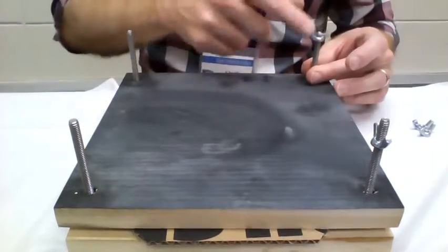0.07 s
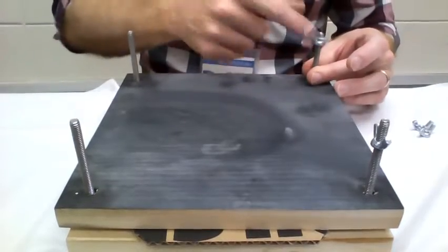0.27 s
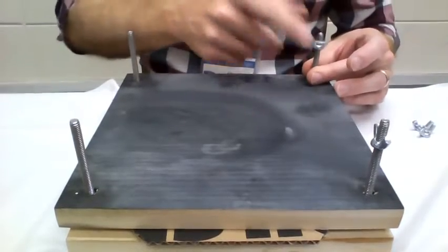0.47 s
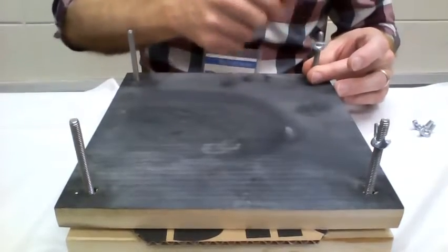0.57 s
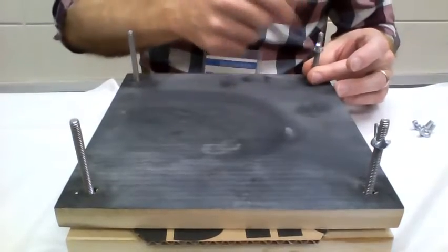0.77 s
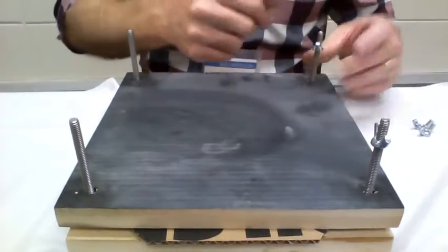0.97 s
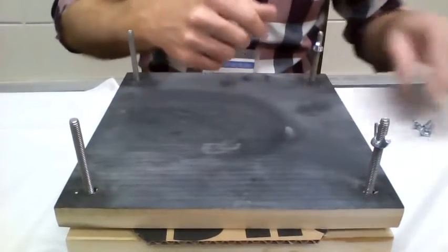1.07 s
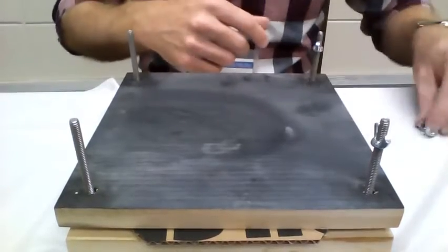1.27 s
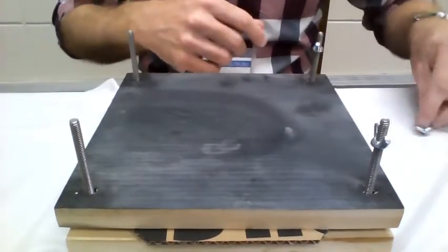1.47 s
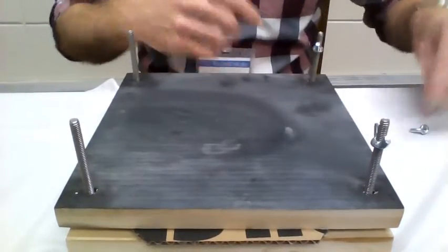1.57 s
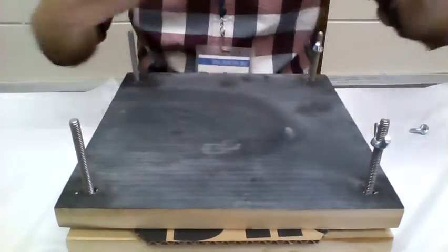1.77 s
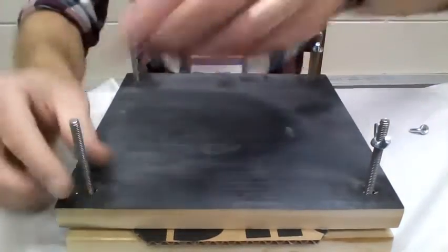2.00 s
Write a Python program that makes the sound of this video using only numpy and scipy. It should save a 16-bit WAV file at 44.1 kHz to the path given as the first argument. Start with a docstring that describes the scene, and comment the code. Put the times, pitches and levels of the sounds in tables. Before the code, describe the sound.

A metal wing nut spins down a threaded bolt with a chattering rattle, flicked at about 0.1 and 0.3 seconds and stopping near 0.55. Soft, low table bumps, pats and faint brushing follow until about 1.1 seconds. A spare nut clicks at 1.4. Near 1.95, a knocked bolt scrapes and briefly rings its heavy metal plate. Low ventilation rumbles throughout in a small, slightly reverberant room.

```python
"""Over a low ventilation rumble, a wing nut spins down a threaded bolt in a heavy metal plate, each
impact on the thread exciting brief modes. A finger flicks it on, and it chatters to a stop after half
a second. A hand bumps the table into low, damped vibration, with pats, brushing and tiny ticks.
A spare nut clicks as it is picked up; last, a hand knocks a front bolt, which scrapes and rings the
plate. A small hard-walled room reverberates after each sound."""
import sys
import numpy as np
from scipy import signal
from scipy.fft import rfft, irfft
from scipy.io import wavfile

SR = 44100
rng = np.random.default_rng(int(sys.argv[2]) if len(sys.argv) > 2 else 0)


def pcm_store(signal):
    """Save signal as 16-bit PCM."""
    levels = np.round(np.clip(np.atleast_2d(signal), -1, 1) * 32767)
    wavfile.write(sys.argv[1], SR, levels.astype(np.int16).T)


N = 89875
T = np.arange(SR // 4) / SR  # time within one event [s]


def amp(db):
    """Amplitude ratio of a level in decibels."""
    return 10 ** (np.asarray(db) / 20)

def read(points, hz):
    """Linear interpolation over log frequency."""
    f, value = np.transpose(points)
    return np.interp(np.log(hz + 1), np.log(f), value)

def octaves(hz, low_hz=1940, high_hz=8000):
    """Octaves into the band over which a harder impact tilts the spectrum."""
    return np.log2(np.clip(hz, low_hz, high_hz) / low_hz)

def add(mix, s, sound):
    """Superposition: a sound joins the mix at time s."""
    part = mix[max(round(s * SR), 0):][:len(sound)]
    part += sound[:len(part)]

def blow(x, span_s=.01):
    """Energy normalisation: an impact has 0 dB when its energy is spread over span_s."""
    return x * np.sqrt(span_s * SR / (np.sum(x ** 2) + 1e-20))

def colour(x, points, tilt_db=0, size=2048):
    """Minimum-phase filtering by a spectrum and a tilt per octave."""
    hz = abs(np.fft.fftfreq(size, 1 / SR))
    log_gain = np.log(amp(read(points, hz) + tilt_db * octaves(hz)))
    taps = np.fft.ifft(np.exp(np.conj(signal.hilbert(log_gain)))).real[:size // 2]
    return signal.fftconvolve(x, taps)[:len(x)]

def onset(rise_s):
    """Finite contact time rounds an attack."""
    return (1 - np.exp(-T / (rise_s + 1e-6))) ** 2

def burst(decay_s, rise_s=0):
    """Incoherent summation: many tiny contacts merge into decaying noise."""
    return blow(rng.standard_normal(len(T)) * np.exp(-T / decay_s) * onset(rise_s))

def ring(modes, tilt_db=0, scatter=0, detune=0):
    """Modal superposition: damped sinusoids, whose weights and tuning vary with the point of impact."""
    hz, db, t60 = np.transpose(modes)[:, :, None]
    weight = amp(db + tilt_db * octaves(hz)) * (1 + scatter * rng.standard_normal(hz.shape))
    hz = hz * (1 + detune * rng.standard_normal(hz.shape))
    weight *= rng.choice([-1, 1], hz.shape)
    return blow((weight * np.exp(-np.log(1000) * T / t60) * np.sin(2 * np.pi * hz * T)).sum(0))

# ventilation spectrum (frequency [Hz], spectral level [dB])
VENT_SPECTRUM = [(20, 3.5), (38, -13), (53, 3), (75, -11.5), (120, -12), (200, -21), (350, -25),
                 (1100, -30), (2100, -34), (14500, -39.5), (16000, -41)]

def ventilation(db=-46.5):
    """Stationary broadband noise: a low rumble with faint hiss."""
    noise = rfft(rng.standard_normal(N))
    rumble = irfft(noise * amp(read(VENT_SPECTRUM, np.fft.rfftfreq(N, 1 / SR))), N)
    return amp(db) * rumble / rumble.std()

# modes of nut and bolt (frequency [Hz], level [dB], T60 [s])
NUT_MODES = [(1307, -2.5, 0.051), (1482, -11, 0.04), (1587, 1.5, 0.04), (1796, -2, 0.043), (1898, -4, 0.04),
             (2007, -5, 0.03), (2356, -16, 0.063), (2572, -11.5, 0.055), (3300, -19, 0.034),
             (3970, -8, 0.019), (4236, -14.5, 0.02), (5270, -20.5, 0.011), (6970, -36, 0.024),
             (9080, -21.5, 0.014), (14300, -39, 0.013)]
# dry tick of a contact (frequency [Hz], spectral level [dB])
CONTACT_SPECTRUM = [(100, -1), (270, 0.5), (400, -10), (560, 0), (1000, -0.5), (1650, 5.5), (2900, -5),
                    (4200, -17.5), (4700, -21), (6000, -21.5), (10300, -38), (11500, -43), (16000, -34)]

def thread_impact(s, tilt_db, rise_s, fade_db_per_s=14, choke_s=.013):
    """Impact excitation: nut strikes thread, giving a tick and a ring that contact damping chokes."""
    modes = np.array(NUT_MODES)
    modes[0, 1] -= fade_db_per_s * s  # the lowest mode fades as the nut travels down
    ringing = ring(modes, tilt_db, scatter=.24, detune=.01)
    tick = amp(-5.5) * blow(colour(burst(decay_s=.0022), CONTACT_SPECTRUM, tilt_db))
    return blow((ringing + tick) * onset(rise_s) * np.exp(-(T / choke_s) ** 2))

# clacks as the nut is flicked or stopped (time [s], level [dB], tilt [dB/octave])
NUT_CLACKS = [(.097, -32, 10.5), (0.1241, -31, -0.5), (0.1288, -34.5, 3), (0.1571, -32, 0.5),
              (.303, -33, -3), (0.3284, -26.5, 7), (.335, -31.5, 8), (.343, -32, 4.5), (.369, -43, -17),
              (0.4028, -33.5, -4), (.476, -36.5, -4), (.483, -35.5, -7), (.506, -47, 7), (0.532, -38, -1.5),
              (0.5561, -33, 5.5), (0.5589, -32.5, -7)]
# fingernail strikes on the wings (time [s], level [dB])
NAIL_FLICKS = [(0.0968, -33.5), (0.1157, -39.5), (0.3301, -35)]
# modes of the wings (frequency [Hz], level [dB], T60 [s])
WING_MODES = [(2500, -5, 0.018), (3320, 4, 0.021), (3960, -4, 0.022), (4290, -7.5, 0.04), (5420, -6, 0.02)]
# chatter envelope as the nut is driven and coasts (time [s], level [dB])
CHATTER_LEVELS = [(0, -32.5), (0.024, -40), (.05, -44.5), (.11, -59.5), (.135, -40), (0.167, -41),
                  (0.182, -48.5), (0.216, -38.5), (0.267, -36), (0.319, -45.5), (0.334, -34.5),
                  (.385, -38.5), (.41, -36.5), (0.47, -44), (.5, -70)]

def wing_nut(count=160, rate_hz=250, jitter=.6, scatter_db=3):
    """Rattling in a clearance: the flicked nut grazes the thread unevenly; firm contacts are brighter."""
    out = np.zeros(N)
    for s, db, tilt_db in NUT_CLACKS:
        add(out, s, amp(db) * thread_impact(s, tilt_db, rise_s=.00018))
    for s, db in NAIL_FLICKS:
        add(out, s, amp(db) * ring(WING_MODES))
    times, levels = np.transpose(CHATTER_LEVELS)
    for k, (late, firm) in enumerate(rng.uniform(-1, 1, (count, 2))):
        s = (k + jitter * late) / rate_hz
        hit = thread_impact(s, tilt_db=-1.5 + 3 * firm, rise_s=.00043)
        slide = burst(decay_s=.0013)  # sliding along the thread smears the impact
        graze = blow(signal.fftconvolve(hit, slide)[:len(T)])
        if s < times[-1]:
            add(out, s, amp(np.interp(s, times, levels) + scatter_db * firm) * graze)
    return out

# reverberation time (frequency [Hz], T60 [s])
REVERB_TIMES = [(150, 0.63), (500, .48), (1500, 0.38), (4000, 0.25), (10000, 0.11)]
# reverberant gain (frequency [Hz], level [dB])
REVERB_GAINS = [(60, 6), (150, 4.5), (1200, 1.5), (4000, -8), (10000, -14.5)]

def room(x, delay_s=.005, size=256):
    """Diffuse reverberation: dense reflections decay exponentially, the treble first."""
    hz, t, noise = signal.stft(rng.standard_normal(SR), SR, nperseg=size)
    t60 = read(REVERB_TIMES, hz)[:, None]
    fade = np.exp(-np.log(1000) * t / t60) * np.sqrt(2 * np.log(1000) / (t60 * SR))
    tail = signal.istft(noise * fade * amp(read(REVERB_GAINS, hz))[:, None], SR, nperseg=size)[1]
    out = np.zeros(N)
    add(out, delay_s, signal.fftconvolve(x, tail))
    return out

# soft blows of the hand (time [s], level [dB], frequency [Hz], T60 [s], rise [s])
TABLE_THUMPS = [(.098, -36.5, 99, 0.033, 0.0025), (.113, -36, 169, 0.22, 0.0023),
                (.533, -29, 95, 0.082, 0.0077), (0.709, -37.5, 101.7, 0.06, 0.0061),
                (1.017, -37.5, 72, 0.033, 0.0014), (1.023, -34.5, 168, 0.11, 0.0058),
                (1.388, -48.5, 177, .25, 0.0096), (1.979, -42, 267, 0.036, 0.00043)]

def thumps():
    """Damped oscillation: each soft blow excites one low mode of plate and table."""
    out = np.zeros(N)
    for s, db, hz, t60, rise in TABLE_THUMPS:
        envelope = (1 - np.exp(-T / rise)) * np.exp(-np.log(1000) * T / t60)
        add(out, s, amp(db) * blow(-np.sin(2 * np.pi * hz * T) * envelope))
    return out

# pats of the hand (time [s], level [dB], decay [s])
HAND_PATS = [(.1, -31.5, 0.0041), (1.0166, -39.5, 0.0057), (1.072, -49.5, 0.0084), (1.9358, -34.5, 0.0026)]
# spectrum of a pat (frequency [Hz], spectral level [dB])
PAT_SPECTRUM = [(60, -8.5), (360, 1.5), (600, 0), (1000, -14.5), (1700, -14.5), (3000, -29), (6000, -25),
                (8000, -38), (16000, -52)]

def pats():
    """Compliant impact: a soft hand gives a dull burst with little treble."""
    out = np.zeros(N)
    for s, db, decay_s in HAND_PATS:
        add(out, s, amp(db) * blow(colour(burst(decay_s), PAT_SPECTRUM)))
    return out

# strokes of skin and sleeve (time [s], duration [s], level [dB], tilt [dB/octave])
BRUSH_STROKES = [(0.698, 0.049, -52.5, 5.5), (1.058, 0.063, -54.5, 12), (1.878, 0.038, -53, 2)]
# spectrum of a stroke (frequency [Hz], spectral level [dB])
BRUSH_SPECTRUM = [(200, 15.5), (2000, 6), (4000, -6.5), (8500, -4.5), (12000, -17), (16000, -7)]

def brushing():
    """Friction noise: skin and sleeve rub in strokes that swell and fade."""
    out = np.zeros(N)
    for s, length, db, tilt_db in BRUSH_STROKES:
        rub = colour(rng.standard_normal(len(T)), BRUSH_SPECTRUM, tilt_db)
        add(out, s, amp(db) * rub / rub.std() * np.sin(np.pi * np.minimum(T / length, 1)))
    return out

# ticks as the hand moves away (time [s], level [dB])
TICKS = [(1.0481, -49.5), (1.076, -50), (1.091, -52)]
# spectrum of a tick (frequency [Hz], spectral level [dB])
TICK_SPECTRUM = [(500, -23), (4000, -14), (8000, -5), (11000, 1), (13500, -5), (15700, 1)]

def ticks():
    """Short transients: tiny contacts radiate mostly high treble."""
    out = np.zeros(N)
    for s, db in TICKS:
        add(out, s, amp(db) * blow(colour(burst(decay_s=.0014), TICK_SPECTRUM)))
    return out

# contacts as the spare nut is picked up (time [s], level [dB])
PICKUPS = [(1.385, -34.5), (1.417, -50.5)]
# spectrum of click and skid (frequency [Hz], spectral level [dB])
PICKUP_SPECTRUM = [(40, -23), (170, -10), (480, 3.5), (850, -4), (1350, 1.5), (2100, -7), (2550, 4.5),
                   (4100, 2.5), (5700, -15.5), (8300, -21), (9500, -36), (16000, -36)]

def spare_nut():
    """Impulse response: a broad click excites the room; close by, fingers and cloth damp a brief skid."""
    clicks, skids = np.zeros((2, N))
    impulse = 1. * (T == 0)
    for s, db in PICKUPS:
        add(clicks, s, amp(db) * blow(colour(impulse, PICKUP_SPECTRUM)))
        skid = colour(burst(decay_s=.0026, rise_s=.00043), PICKUP_SPECTRUM)
        add(skids, s, amp(db - 1) * blow(skid))
    return clicks + skids + room(clicks)

# knocks on the front bolt (time [s], level [dB], tilt [dB/octave])
BOLT_KNOCKS = [(1.9373, -33.5, 4.5), (1.943, -31, -9), (1.952, -34, -1.5), (1.98, -35, 4.5)]
# modes of the bolt's first ping and of the plate (frequency [Hz], level [dB], T60 [s])
PING_MODES = [(8900, -3, .008), (14300, -15, .01)]
PLATE_MODES = [(490, -12, .05), (712, -4, 0.05), (965, -5, 0.055), (1104, 0, 0.065), (1243, -7, .05),
               (2030, -5, .025), (2680, -5, 0.025), (3290, -10, 0.02), (4323, -8, 0.018), (5230, -8, .018)]
# scrapes of the bolt in its hole (time [s], duration [s], level [dB], tilt [dB/octave])
BOLT_SCRAPES = [(1.9356, 0.0083, -30, 3.5), (1.9731, 0.013, -29.5, 2)]
# spectrum of scrape and rattle (frequency [Hz], spectral level [dB])
SCRAPE_SPECTRUM = [(200, 1), (1100, 0.5), (2000, 2), (3500, -8.5), (5400, -9), (6000, -25), (9500, -28.5),
                   (11500, -39), (15000, -33)]

def front_bolt(ping_s=1.937, ping_db=-36.5, rattle_db=-8):
    """Impact and friction: the knocked bolt pings, excites the plate's modes, rattles and scrapes."""
    out = np.zeros(N)
    add(out, ping_s, amp(ping_db) * ring(PING_MODES))
    for s, db, tilt_db in BOLT_KNOCKS:
        rattle = blow(colour(burst(decay_s=.0092), SCRAPE_SPECTRUM, tilt_db))
        plate = ring(PLATE_MODES, tilt_db, detune=.01)
        add(out, s, amp(db) * blow(plate + amp(rattle_db) * rattle))
    for s, length, db, tilt_db in BOLT_SCRAPES:
        friction = rng.standard_normal(len(T)) * np.sin(np.pi * np.minimum(T / length, 1)) ** 2
        add(out, s, amp(db) * blow(colour(friction, SCRAPE_SPECTRUM, tilt_db)))
    return out

def scene():
    """Direct and reverberant fields add; each source position excites the room to its own degree."""
    nut = wing_nut()
    handling = front_bolt() + pats() + ticks() + brushing()
    sources = [(nut, -4), (handling, -5.5), (thumps(), -11.5)]  # (direct sound, gain into room [dB])
    return (ventilation() + spare_nut() + sum(x + amp(db) * room(x) for x, db in sources))[None]

def record(dry, low_hz=12, high_hz=15700):
    """Band limiting: a low cut and a steep treble edge."""
    cut = signal.sosfilt(signal.butter(2, low_hz, "high", fs=SR, output="sos"), dry)
    lowpass = signal.firwin(511, high_hz, window=("kaiser", 9), fs=SR)
    return signal.oaconvolve(cut, lowpass[None], "same")

dry = scene()
out = record(dry)
pcm_store(out)
```